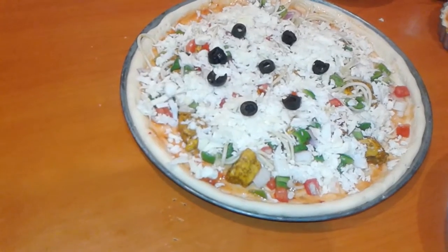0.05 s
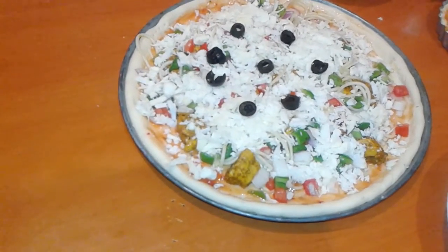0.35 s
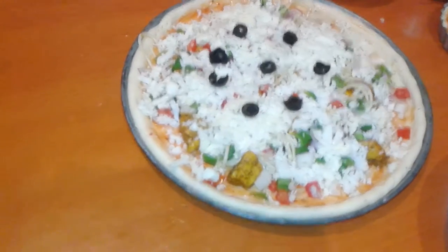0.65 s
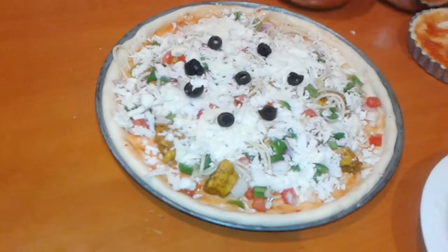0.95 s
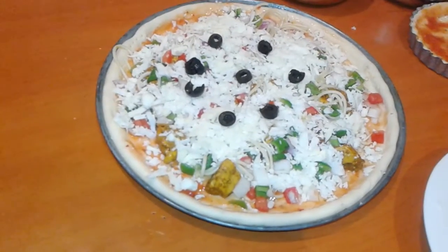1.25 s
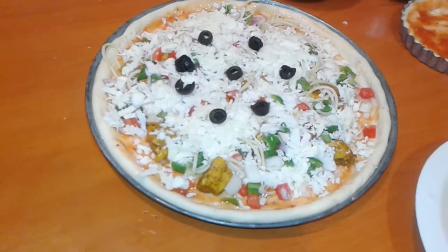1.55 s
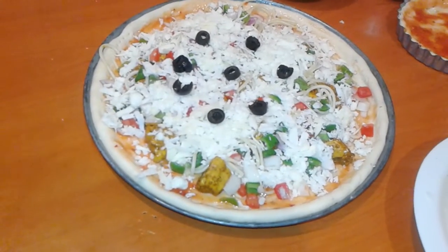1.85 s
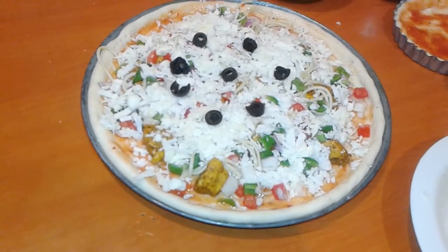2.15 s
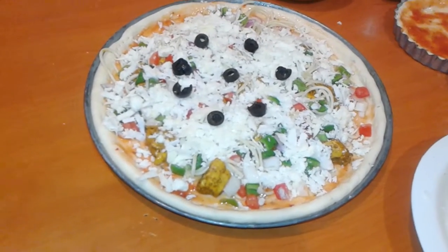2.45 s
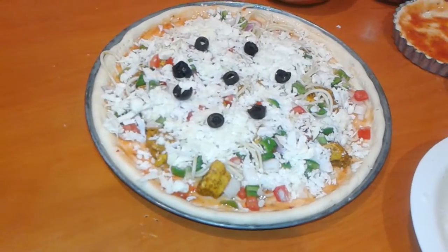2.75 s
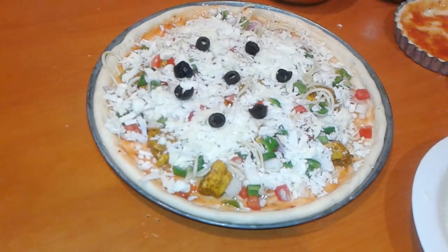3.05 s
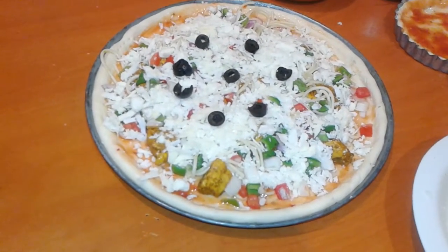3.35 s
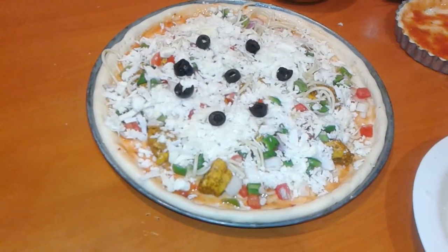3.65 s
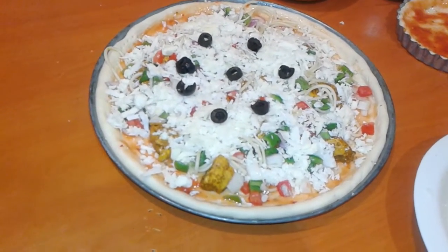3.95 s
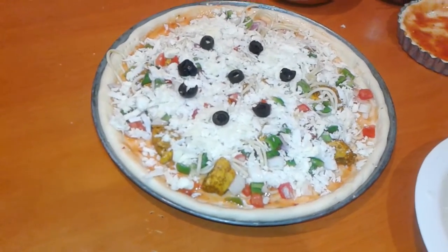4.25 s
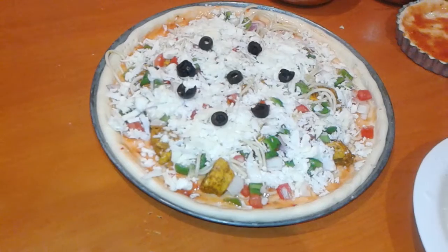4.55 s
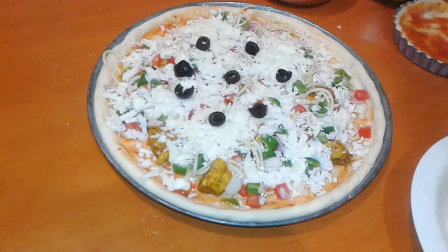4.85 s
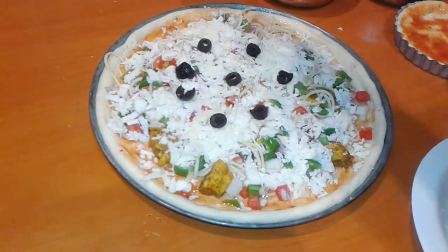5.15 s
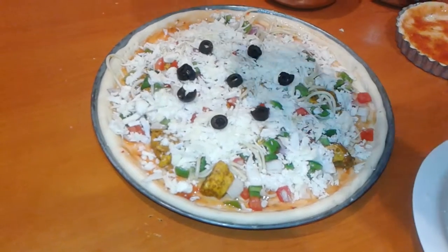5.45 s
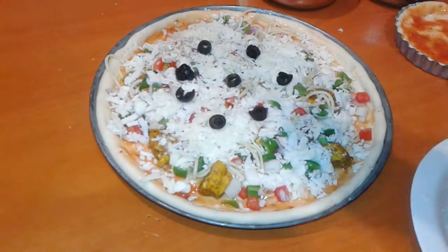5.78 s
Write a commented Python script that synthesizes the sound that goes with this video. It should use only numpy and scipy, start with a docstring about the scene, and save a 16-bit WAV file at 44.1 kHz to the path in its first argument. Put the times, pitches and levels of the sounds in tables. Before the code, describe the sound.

Light rubbing and bumping on a wooden kitchen table, broken by a ringing dish clack and a louder hollow knock.

```python
"""A heavy object is set down on a wooden kitchen table: a hollow knock, then settling rebounds.
Each blow cracks at the contact, rings the wood and swings the table top.
Earlier a hard dish lands with a clack and rings on; the bare kitchen reverberates after each blow.
Between them: soft bumps, light ticks, and the friction noise of sliding and rustling, all close by."""
import sys
import numpy as np
from scipy import signal
from scipy.fft import rfft, irfft
from scipy.io import wavfile
from scipy.ndimage import uniform_filter1d

SR = 44100
rng = np.random.default_rng(int(sys.argv[2]) if len(sys.argv) > 2 else 0)


def wav_out(sig):
    """Save sig, one row per channel (or a flat mono array), as 16-bit PCM at SR to the path in sys.argv[1]."""
    wavfile.write(sys.argv[1], SR, np.round(np.clip(np.atleast_2d(sig).T, -1, 1) * 32767).astype(np.int16))


N = 261017

# handling sounds, and briefly raised noise after the clack and the knock:
# (start [s], length [s], rustle [dB], rub [dB], hiss [dB], hollow resonance [Hz])
NOISE_SWELLS = [(0.0, 0.077, -89, -65, -90, 316), (0.193, 0.1, -65.5, -90, -74, 345),
                (0.3, 0.07, -66, -87, -68, 347), (0.619, 0.2, -62.5, -62, -71, 227.2),
                (0.733, 0.082, -55, -68, -66, 199), (0.823, 0.16, -61, -64, -70, 233),
                (1, 0.45, -66.5, -65.5, -82, 258.5), (1.201, 0.13, -55, -57.5, -64, 780),
                (1.348, 0.11, -62, -52.5, -60, 384), (1.402, 0.092, -49, -46.5, -54, 731),
                (1.496, 0.061, -58.5, -52.5, -75, 317), (1.694, 0.12, -56, -61, -68.5, 846),
                (1.812, 0.19, -56, -55, -64, 427.4), (2.441, 0.11, -59, -68.5, -86, 402),
                (2.645, 0.16, -66, -58.5, -65, 395.3), (2.907, 0.035, -55, -50.5, -53, 564),
                (3.082, 0.12, -54.5, -56.5, -64.5, 850), (3.224, 0.18, -54.5, -57, -67.5, 404),
                (3.385, 0.056, -48.5, -53, -56, 370), (3.49, 0.054, -56, -63, -69, 545),
                (3.515, 0.04, -72, -58, -80, 760), (3.618, 0.12, -61.5, -69, -71.5, 407),
                (3.772, 0.41, -67.5, -70.5, -74, 299.4), (4.023, 0.13, -62, -67.5, -67.5, 302.4),
                (4.17, 0.54, -69.5, -67.5, -70, 303.4), (4.42, 0.41, -81, -58.5, -67, 453.4),
                (5.318, 0.083, -69, -76.5, -72.5, 396), (5.569, 0.045, -73, -90.5, -83, 398),
                (5.73, 0.052, -66.5, -84.5, -77, 398)]
# white spectrum: (frequency [Hz], gain [dB])
FLAT = [(1000, 0)]


def gain_of(db):
    return 10 ** (np.asarray(db) / 20)


def unit_rms(x):
    return x / np.sqrt(np.mean(x ** 2) + 1e-20)


def curve_at(points, hz):
    """Interpolate over log frequency."""
    points_hz, value = np.transpose(points)
    return np.interp(np.log(hz + 1), np.log(points_hz), value)


def panned(pan_db):
    """Stereo gains; pan is left minus right."""
    return gain_of(np.array([[.5], [-.5]]) * pan_db)


def add(mix, start_s, sound):
    part = mix[:, max(round(start_s * SR), 0):][:, :sound.shape[-1]]
    part += sound[..., :part.shape[1]]


def paired(x, colour):
    """Colour two independent signals; bass correlated, as at two close microphones."""
    # (frequency [Hz], left-right correlation [-1..1])
    likeness = [(50, 1), (250, 0.72), (500, 0.62), (1000, 0.24), (2000, -0.12), (4000, -0.0017),
                (8000, 0.019)]
    hz, (a, b) = np.fft.rfftfreq(x.shape[1], 1 / SR), rfft(x)
    same = np.clip(curve_at(likeness, hz), -1, 1)
    mid, side = a * np.sqrt((1 + same) / 2), b * np.sqrt((1 - same) / 2)
    return irfft(np.array([mid + side, mid - side]) * gain_of(curve_at(colour, hz)), x.shape[1])


def kitchen(x, wet_db, colour, delay_s, build_s):
    """Direct sound plus dense, delayed reflections that decay per band."""
    # (frequency [Hz], t60 [s])
    room_t60 = [(100, 1), (260, 0.51), (700, 0.47), (1800, 0.5), (4800, 0.38), (14000, 0.46)]
    taps = paired(rng.standard_normal((2, SR)) * (rng.random((2, SR)) < .15), colour)
    hz, t, bands = signal.stft(taps, SR, nperseg=256)
    decay = gain_of(-60 * t / curve_at(room_t60, hz)[:, None])
    tail = signal.istft(bands * decay, SR, nperseg=256)[1][:, :SR]
    tail *= np.clip((np.arange(SR) / SR - delay_s) / build_s, 0, 1)
    tail *= gain_of(wet_db) / np.linalg.norm(tail[0])
    return x + signal.fftconvolve(x, tail, axes=1)[:, :N]


def swells(starts_s, lengths_s, levels_db, bed_db, release_db_per_s=150):
    """Envelope: each swell rises, eases, dies; power sum over a slowly fading bed."""
    attack_s, ease_db_per_s, bed_db_per_s = 0.061, 5, 0.34
    now = np.arange(0, N, 32) / SR
    power = gain_of(bed_db - bed_db_per_s * (now - now.mean())) ** 2
    for start_s, length_s, db in zip(starts_s, lengths_s, levels_db):
        t = np.maximum(now - start_s, 0)
        rise = np.sin(np.pi / 2 * np.minimum(t / attack_s, 1)) ** 2
        fall_db = ease_db_per_s * t + release_db_per_s * np.maximum(t - length_s, 0)
        power += (rise * gain_of(db - fall_db)) ** 2
    return np.interp(np.arange(N) / SR, now, np.sqrt(power))


def friction(colour, grain_db, patchy_db, resonance=None):
    """Tiny uneven slips in shifting patches of colour; optional gliding resonance."""
    slips = rng.standard_normal((2, N))
    slips *= gain_of(grain_db * unit_rms(uniform_filter1d(rng.standard_normal(N), 90)))
    hz, t, bands = signal.stft(paired(slips, colour), SR, nperseg=512)
    patches = uniform_filter1d(rng.standard_normal(bands.shape[1:]), 7, axis=0)
    field_db = patchy_db * unit_rms(uniform_filter1d(patches, 6, axis=1))
    if resonance is not None:
        times_s, centre_hz, height_db, width_oct = resonance
        octaves = np.log2((hz[:, None] + 1) / np.interp(t, times_s, centre_hz))
        bell = np.exp(-(octaves / width_oct) ** 2) - .5
        field_db += np.interp(t, times_s, height_db * np.ones(len(times_s))) * bell
    return unit_rms(signal.istft(bands * gain_of(field_db), nperseg=512)[1][:, :N])


def hiss():
    """Thin background hiss; swells with handling, stays raised briefly after the clack and knock."""
    # (frequency [Hz], gain [dB])
    colour = [(200, -3), (1500, -2.5), (6000, -2), (9000, -5.5), (14500, -7.5)]
    starts_s, lengths_s, _, _, hiss_db, _ = np.transpose(NOISE_SWELLS)
    level = swells(starts_s, lengths_s, hiss_db, bed_db=-74)
    return gain_of(2.5) * level * friction(colour, grain_db=1.05, patchy_db=2.04)


def dragged_crockery():
    """Slips keep a few crockery modes faintly ringing."""
    # (start [s], length [s], level [dB])
    drags = [(0.774, 0.85, -69)]
    # (frequency [Hz], relative level [dB])
    modes = [(1300, 3), (1620, -1), (2420, 4)]
    slips = rng.standard_normal((2, N))
    tones = sum(gain_of(db) * unit_rms(signal.lfilter(*signal.iirpeak(hz, Q=31, fs=SR), slips))
                for hz, db in modes)
    return unit_rms(tones) * swells(*np.transpose(drags), bed_db=-np.inf)


def hollow_resonance(starts_s, start_hz):
    """Restarts with each swell, then sinks."""
    sink_oct_per_s, height_db, width_oct = 1.76, 8, .35
    now = np.arange(0, N, 128) / SR
    latest = np.maximum(np.searchsorted(starts_s, now) - 1, 0)
    centre_hz = start_hz[latest] * 2 ** (-sink_oct_per_s * (now - starts_s[latest]))
    return now, centre_hz, height_db, width_oct


def handling():
    """Hands lean and shift things: rumble, dull rub, dry rustle drifting left to right."""
    # friction spectra: (frequency [Hz], gain [dB])
    rumble_colour = [(20, -37), (38, -19), (55, -3.5), (85, -7), (120, 5), (160, -7), (200, -7), (260, -24),
                     (500, -35)]
    rub_colour = [(130, -28.5), (195, -1), (320, -0.5), (450, -4.5), (570, -2), (700, -5), (850, -7),
                  (1050, -13.5), (1500, -14), (2000, -17.5), (5000, -46)]
    rustle_colour = [(500, -23.5), (1200, -11.5), (1800, -6), (2500, -2.5), (3400, -1), (4300, 1.5),
                     (5400, -3.5), (6500, -8), (8500, -16.5), (14000, -22.5)]
    # leaning hands: (start [s], length [s], rumble [dB])
    leans = [(0.637, 0.14, -55), (1.5, 0.06, -53.5), (1.664, 0.18, -61.5), (2.37, 0.5, -64),
             (3.247, 0.069, -54), (3.43, 0.13, -54.5), (3.864, 0.17, -56), (4.177, 0.48, -56.5),
             (4.939, 0.19, -62)]
    # brushing contact: (time [s], resonance [Hz], height [dB], pan [dB])
    brush = [(0.7, 4300, -2.5, 4.5), (1.0, 4020, 12, 9.5), (1.08, 4260, 0.5, 5), (1.8, 4380, -0.5, 4.5),
             (3.299, 5100, 3.5, 1), (5.6, 5400, 9.5, -2)]
    starts_s, lengths_s, rustle_db, rub_db, _, hollow_hz = np.transpose(NOISE_SWELLS)
    brush_s, brush_hz, height_db, pan_db = np.transpose(brush)
    speed = swells(starts_s, lengths_s, rustle_db, bed_db=-77)
    pressure = swells(starts_s, lengths_s, rub_db, bed_db=-72.5)
    leaning = swells(*np.transpose(leans), bed_db=-68, release_db_per_s=69.5)
    weight = np.hypot(leaning, gain_of(-6) * pressure)  # rubbing also shakes the table
    rumble = weight * friction(rumble_colour, grain_db=-1.0, patchy_db=2.0) * panned(-1.1)
    hollow = hollow_resonance(starts_s, hollow_hz)
    rub = pressure * friction(rub_colour, grain_db=1.4, patchy_db=1.5, resonance=hollow)
    brushing = (brush_s, brush_hz, height_db, .2)
    rustle = speed * friction(rustle_colour, grain_db=1.0, patchy_db=0.77, resonance=brushing)
    rustle *= panned(np.interp(np.arange(N) / SR, brush_s, pan_db))
    return gain_of(-1.5) * rumble + gain_of(-0.5) * rub + gain_of(-1.46) * rustle


def ticks():
    """Light touches of crockery and fingers: one fuzzy pitch each; shorter ones start sharper."""
    # (time [s], level [dB], pitch [Hz], t60 [s], fuzz [0..1])
    touches = [(0.46, -54, 2550, 0.018, 0.07), (0.4605, -50, 4940, 0.011, 0.03),
               (0.6965, -42, 3880, 0.028, 0.26), (2.4705, -43.5, 2398, 0.17, 0.36),
               (2.933, -48.5, 2210, 0.2, 0.14), (3.441, -30.5, 5630, .0093, 0.23),
               (4.4632, -34, 2210, 0.03, 0.04), (4.750, -34, 1255, 0.034, 0.48),
               (5.2286, -54.5, 5660, 0.018, .2), (5.6185, -52, 5360, 0.019, 0.15),
               (5.6525, -55, 5200, 0.01, 0.08), (5.826, -54, 4970, 0.018, .18)]
    out, t = np.zeros((2, N)), np.arange(4096) / SR
    for time_s, db, hz, t60_s, fuzz in touches:
        wobble = unit_rms(uniform_filter1d(rng.standard_normal((2, len(t))), size=16))
        cycles = np.cumsum(hz * (1 + fuzz * wobble), 1) / SR
        envelope = gain_of(db - 60 * t / t60_s) * (1 - np.exp(-t / (0.0359 * t60_s)))
        add(out, time_s, envelope * np.sin(2 * np.pi * cycles))
    return kitchen(out, wet_db=-7.0, colour=FLAT, delay_s=0.0024, build_s=0.01017)


def crack(colour, t60_s, scatter, tilt_db_per_oct=0, peak_hz=2000, peak_db=0):
    """Sharp contact: impulse plus decaying scatter, coloured; energy of a 1 ms burst."""
    size, half_width_oct = 4096, 0.5
    hz, t = abs(np.fft.fftfreq(size, 1 / SR)), np.arange(size) / SR
    resonance_db = peak_db / (1 + (np.log2((hz + 1) / peak_hz) / half_width_oct) ** 2)
    colour_db = curve_at(colour, hz) + resonance_db + tilt_db_per_oct * np.log2((hz + 100) / 2000)
    minimum_phase = np.exp(np.conj(signal.hilbert(np.log(gain_of(colour_db)))))
    burst = paired(rng.standard_normal((2, size)), FLAT) * gain_of(-60 * t / t60_s)
    burst *= scatter / np.linalg.norm(burst[0])
    burst[:, 0] += 1
    sound = np.fft.ifft(np.fft.fft(burst) * minimum_phase).real
    return unit_rms(sound) * np.sqrt(SR / 1000 / size)


def ring(modes, pitch, rise_s):
    """Damped modes with a soft onset; pitch scales their frequencies."""
    t = np.arange(SR) / SR
    tones = sum(gain_of(db - 60 * t / t60_s) * np.sin(2 * np.pi * hz * pitch * t)
                for hz, db, t60_s in modes)
    return tones * (1 - np.exp(-t / rise_s))


def dish():
    """A hard dish lands on its rim and rebounds, each contact at its own pitch, then rings on."""
    # (time [s], level [dB], resonance [Hz], half its height [dB], pan [dB])
    clacks = [(2.589, -23, 5330, 9, -5), (2.5914, -28, 3010, 16, 0), (2.5927, -23, 1420, 5.5, 1.5),
              (2.5994, -27, 3620, 6.1, 7.5), (2.6011, -21.5, 3430, 4, 0.5), (2.6129, -29, 3200, 11, 10),
              (2.6165, -26.5, 3900, 10, 9.5)]
    # (frequency [Hz], gain [dB])
    clack_colour = [(80, -9), (300, -6.5), (650, 1.5), (950, -2.5), (1400, 1), (1950, -1), (3300, 1),
                    (4500, -4), (5400, -5), (7000, -11.5), (8500, -24.5), (14000, -36)]
    # (nominal frequency [Hz], level [dB], t60 [s])
    modes = [(584, -48.5, 0.68), (661, -47, 0.26), (691, -45, 0.56), (1392, -42.5, 0.46), (1411, -51, 0.43),
             (1573, -32.5, 0.096), (2720, -40.5, 0.166), (3270, -49, .26), (3370, -44, 0.31)]
    contacts, ringing = np.zeros((2, N)), np.zeros((2, N))
    for time_s, db, peak_hz, half_db, pan_db in clacks:
        clack = crack(clack_colour, t60_s=0.011, scatter=1.92, peak_hz=peak_hz, peak_db=2 * half_db)
        add(contacts, time_s, gain_of(db) * panned(pan_db) * clack)
    add(ringing, clacks[0][0], panned(1.9) * ring(modes, pitch=0.97, rise_s=0.0019))
    room_colour = [(100, 4), (650, 5.5), (1400, -2.5), (3300, -4.5), (6000, -8.5)]
    return ringing + kitchen(contacts, wet_db=-1.0, colour=room_colour, delay_s=0.0029, build_s=0.006)


def table_knocks():
    """Each blow or rebound cracks at the contact, thuds in the hollow wood and swings the top."""
    # (time [s], level [dB], pitch [ratio], relative crack [dB], relative boom [dB])
    knocks = [(0.663, -47, 0.405, -31, -28), (2.6005, -28.5, 1.42, 4, -9), (2.603, -33.5, .92, 4, -3),
              (2.689, -44, 1.8, -10, 16.5), (2.931, -37.5, 1.01, -3.5, -29), (3.112, -47, 0.91, -7, 1),
              (3.177, -43.5, 0.93, -6, -15), (3.279, -44, 0.67, -18, 13), (3.317, -46, 0.76, 2, -6),
              (3.441, -43, 0.73, -22, -3), (3.541, -39, 0.94, -16, -13), (4.3924, -9, 1, -6, -1.5),
              (4.4143, -27.5, 1.02, -8, -25), (4.420, -35.5, 0.94, -8, -29), (4.439, -32.5, .72, -7, -23),
              (4.4555, -24.5, 1.06, -9.5, -22), (4.7489, -33.5, 1.016, -1, 4.5),
              (4.768, -41.5, 0.73, -3, -8)]
    # hollow wood, whole table top: (nominal frequency [Hz], level [dB], t60 [s])
    wood_modes = [(460.4, 10.5, 0.031), (462, -26.5, 0.46), (413, -20.5, 0.043), (529, -13, .06),
                  (585, -34.5, .25), (290, -27.5, .3)]
    top_modes = [(100.7, -26, .65), (120.1, -24.5, 1), (141.7, -27.5, .7), (192, -14.5, 0.092)]
    # (frequency [Hz], gain [dB])
    crack_colour = [(50, -15.5), (160, 1.5), (400, 0.5), (850, 1), (1150, -6), (1400, -9.5), (1800, -13.5),
                    (2300, -8.5), (3000, -9.5), (5200, -12), (8000, -22.5), (14000, -39)]
    blows, swing = np.zeros((2, N)), np.zeros((2, N))
    boom, boom_lag_s = ring(top_modes, pitch=0.98, rise_s=0.0014), 0.01202
    for time_s, db, pitch, crack_db, boom_db in knocks:
        add(blows, time_s, gain_of(db) * ring(wood_modes, pitch, rise_s=0.0058))
        contact = crack(crack_colour, t60_s=0.12, scatter=5.4, tilt_db_per_oct=-1.5)
        add(blows, time_s, gain_of(db + crack_db - 3.0) * contact)
        add(swing, time_s + boom_lag_s, gain_of(db + boom_db) * boom)
    # near blow: mostly direct sound where the wood rings loudest
    room_colour = [(100, -1.5), (300, -4), (430, -7.5), (490, -9.0), (620, -3.5), (800, -2.0), (2000, 0)]
    in_room = kitchen(blows * panned(1.7), wet_db=-3.0, colour=room_colour, delay_s=0.01, build_s=0.004)
    return swing * panned(-1.2) + in_room


def scene():
    return dish() + table_knocks() + ticks() + handling() + hiss() + dragged_crockery()


def record(dry):
    """Microphone low cut, then band limit."""
    low_cut_hz, edge_hz = 45, 14650
    heard = signal.sosfilt(signal.butter(6, low_cut_hz, "high", fs=SR, output="sos"), dry)
    lowpass = signal.firwin(511, edge_hz, window=("kaiser", 9), fs=SR)
    return signal.oaconvolve(heard, lowpass[None], "same")


dry = scene()
out = record(dry)
wav_out(out)
```